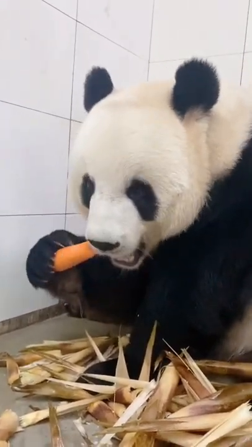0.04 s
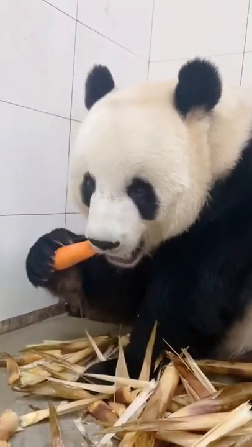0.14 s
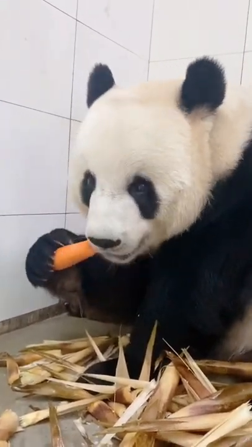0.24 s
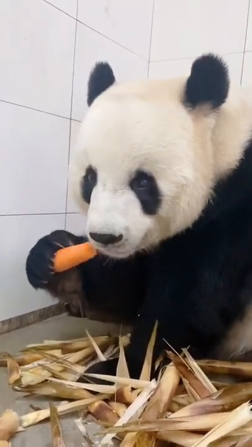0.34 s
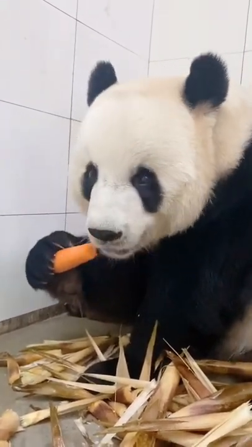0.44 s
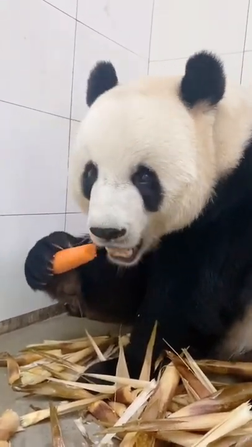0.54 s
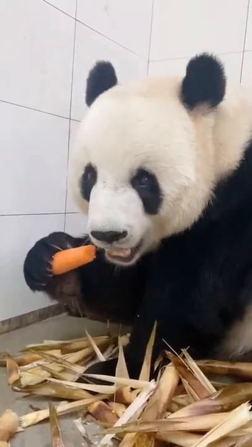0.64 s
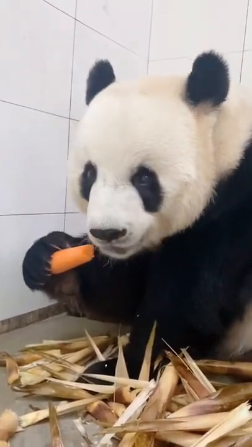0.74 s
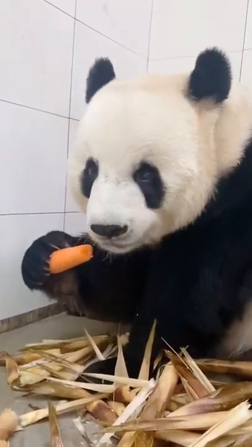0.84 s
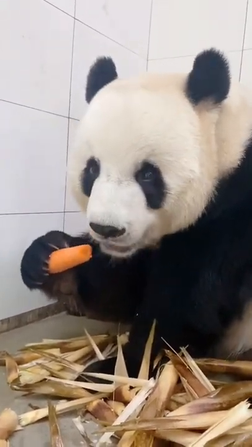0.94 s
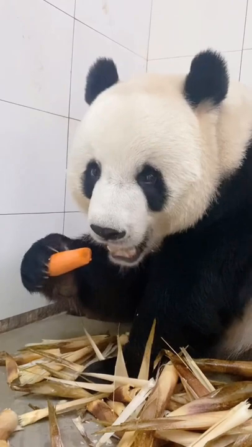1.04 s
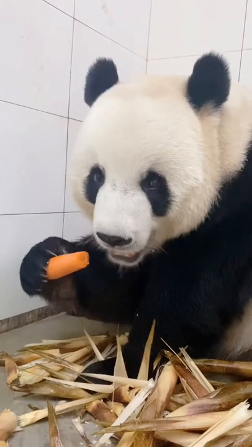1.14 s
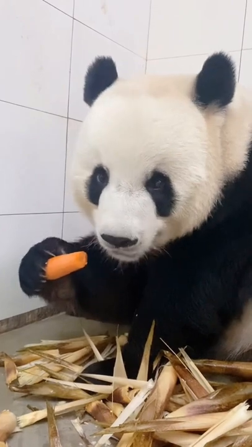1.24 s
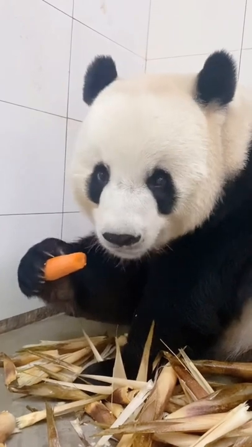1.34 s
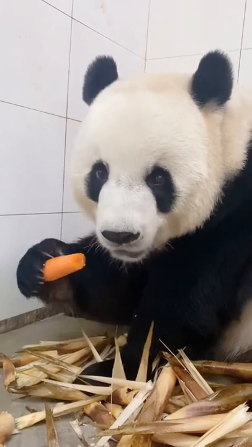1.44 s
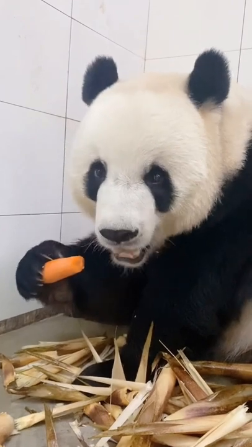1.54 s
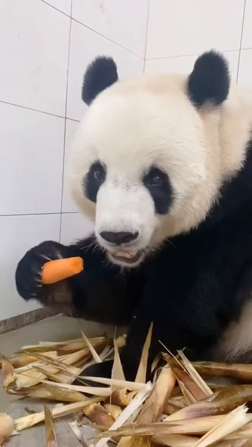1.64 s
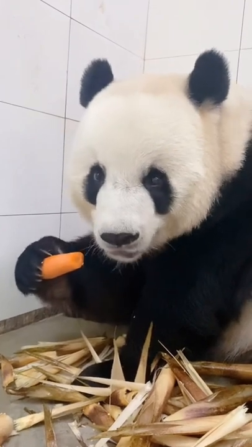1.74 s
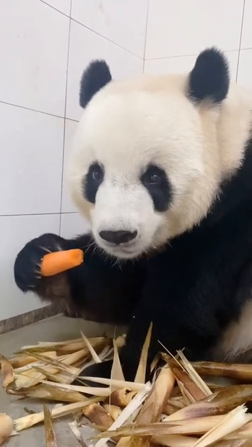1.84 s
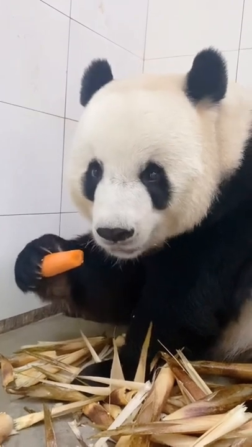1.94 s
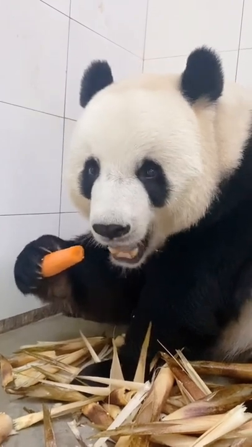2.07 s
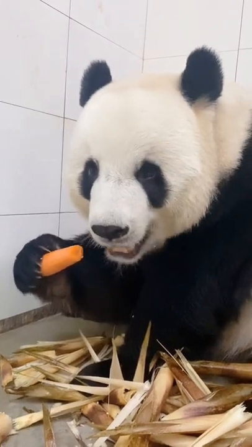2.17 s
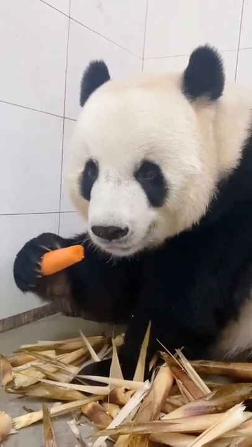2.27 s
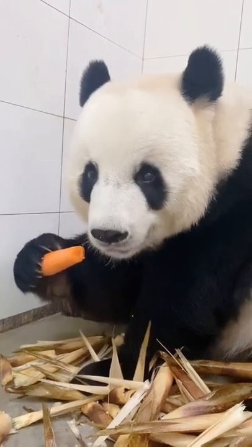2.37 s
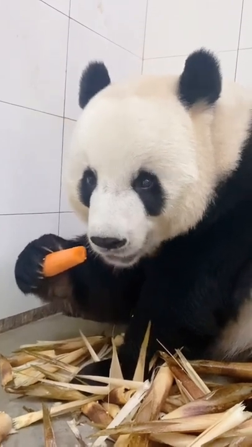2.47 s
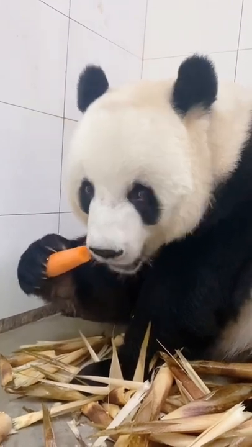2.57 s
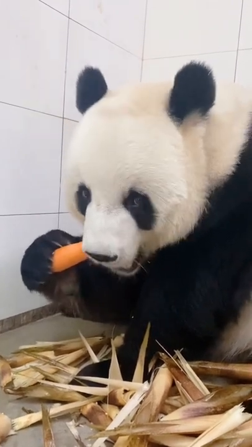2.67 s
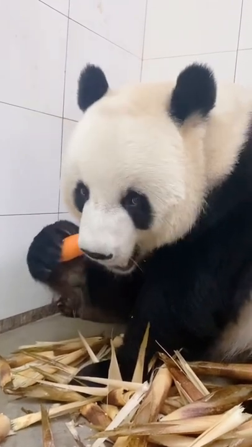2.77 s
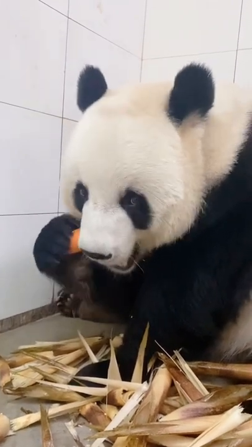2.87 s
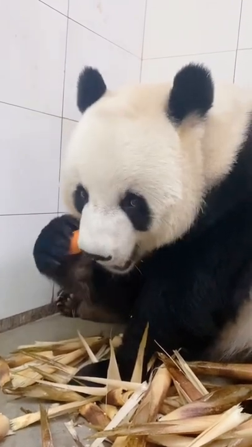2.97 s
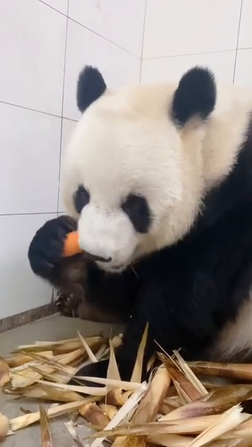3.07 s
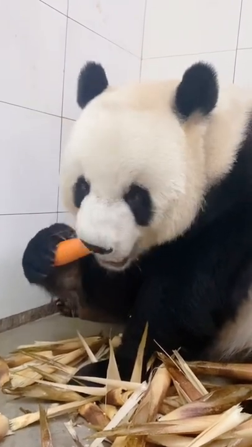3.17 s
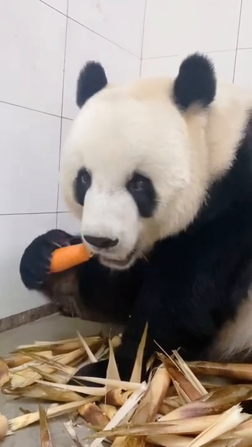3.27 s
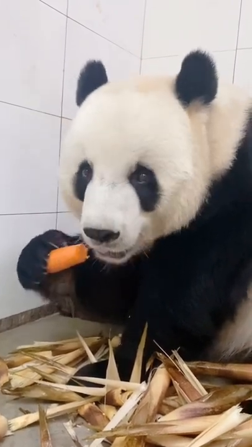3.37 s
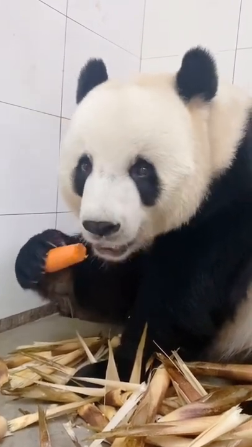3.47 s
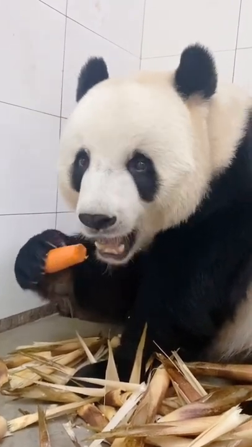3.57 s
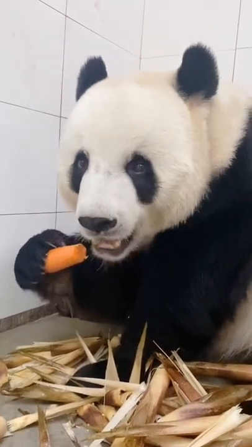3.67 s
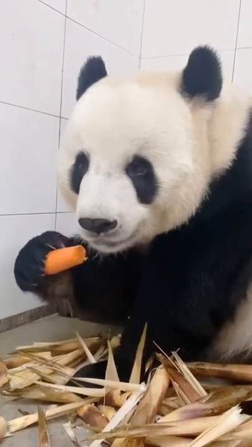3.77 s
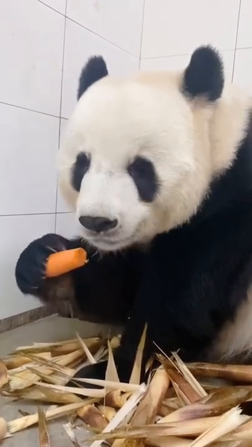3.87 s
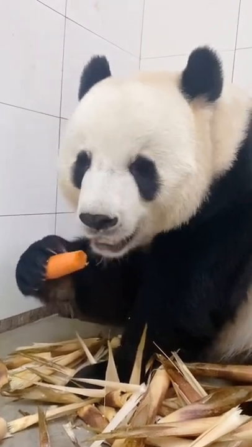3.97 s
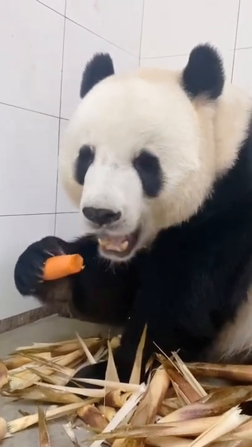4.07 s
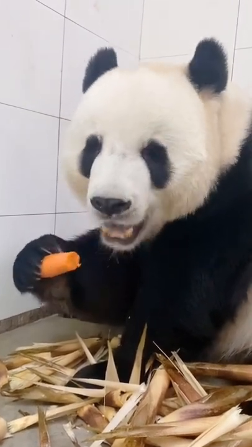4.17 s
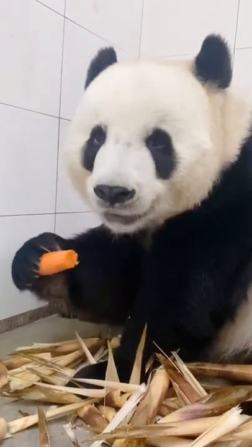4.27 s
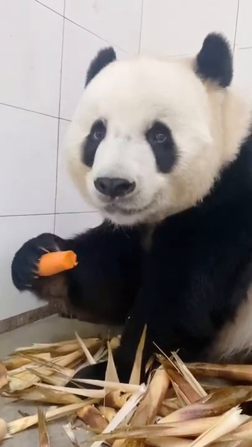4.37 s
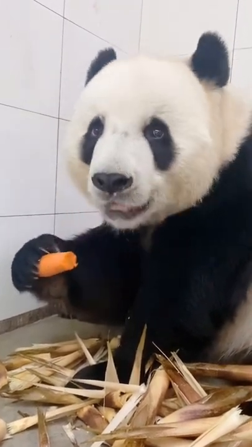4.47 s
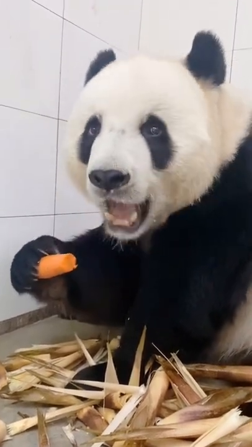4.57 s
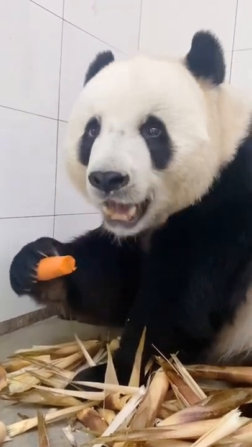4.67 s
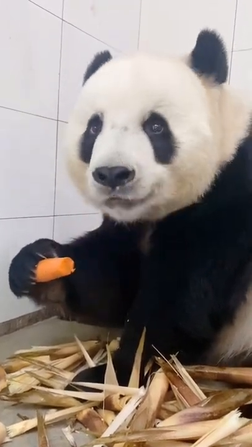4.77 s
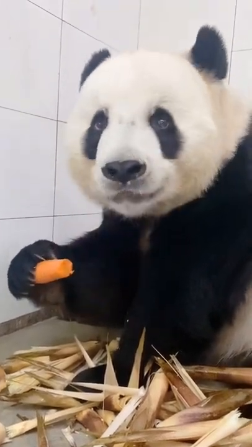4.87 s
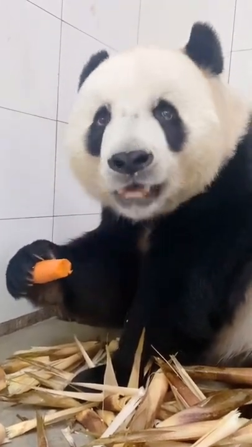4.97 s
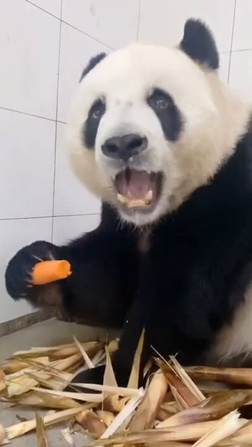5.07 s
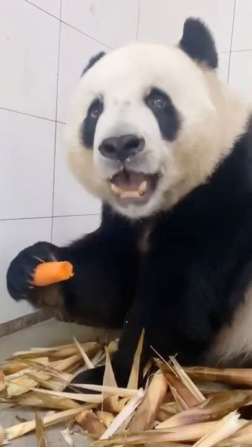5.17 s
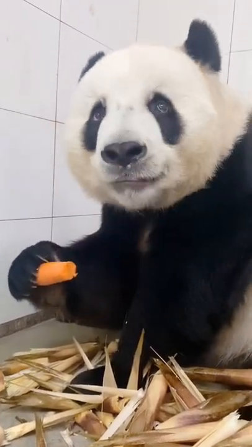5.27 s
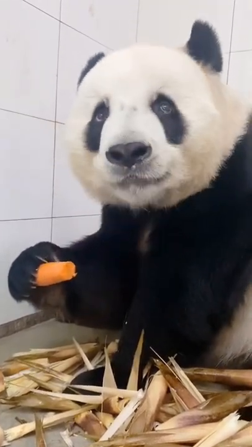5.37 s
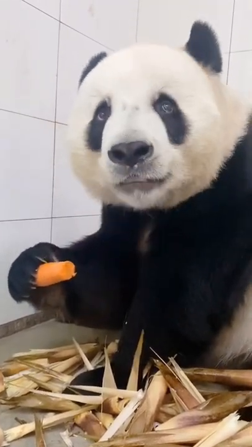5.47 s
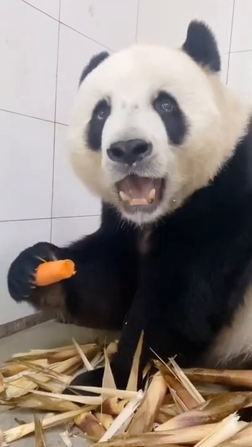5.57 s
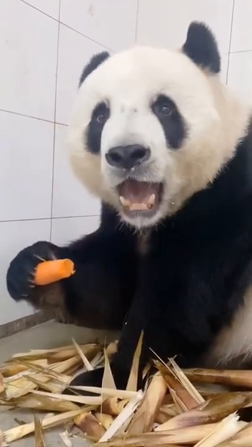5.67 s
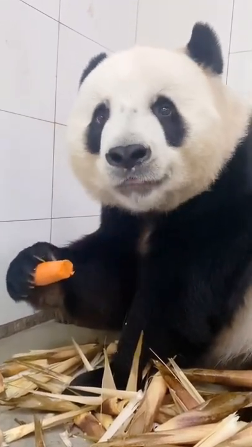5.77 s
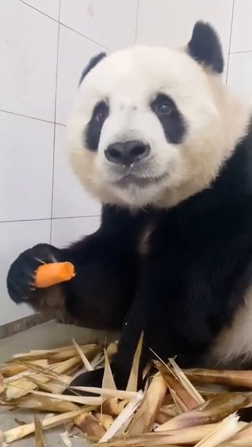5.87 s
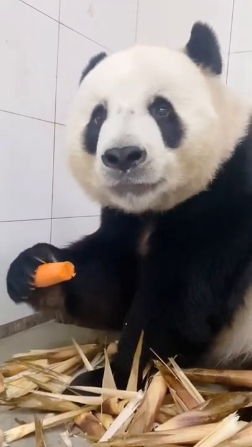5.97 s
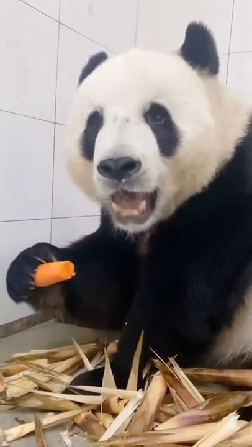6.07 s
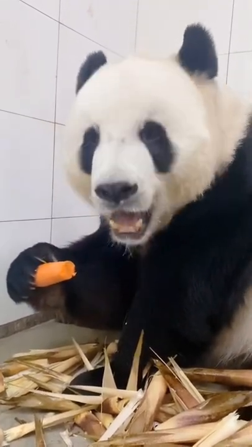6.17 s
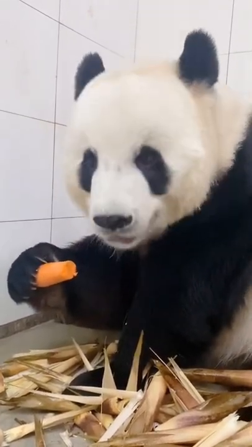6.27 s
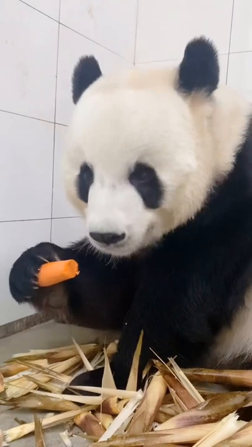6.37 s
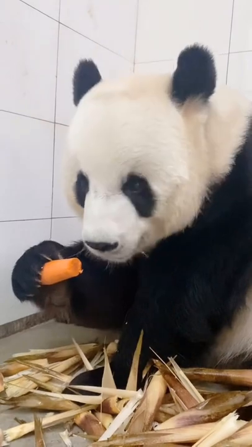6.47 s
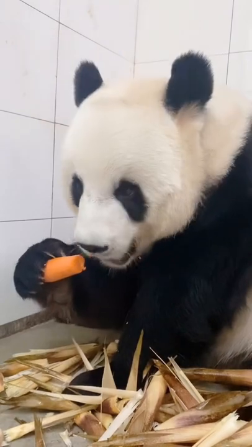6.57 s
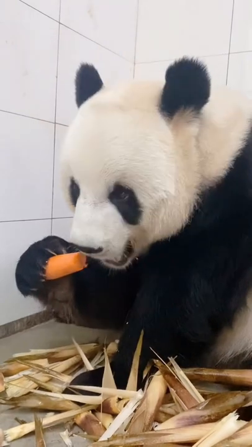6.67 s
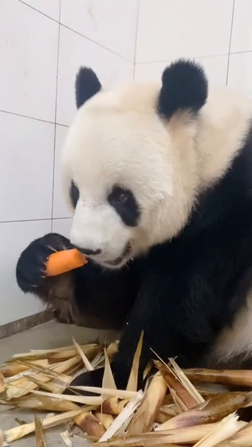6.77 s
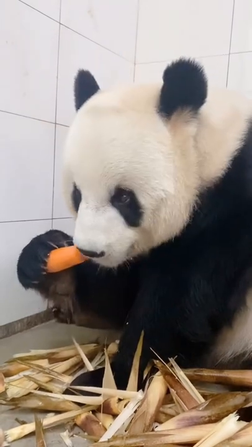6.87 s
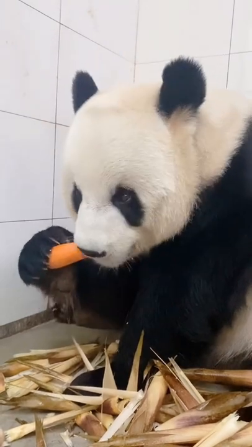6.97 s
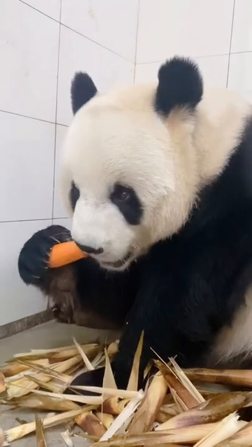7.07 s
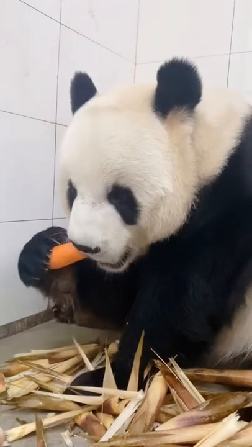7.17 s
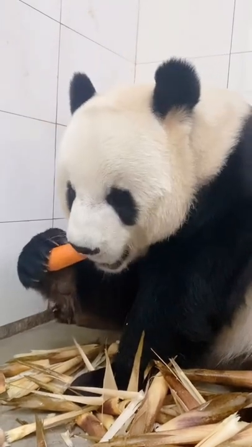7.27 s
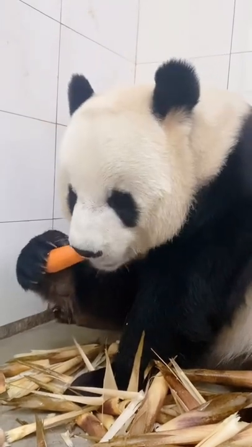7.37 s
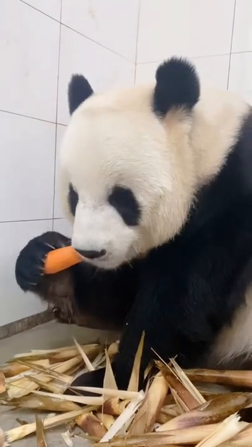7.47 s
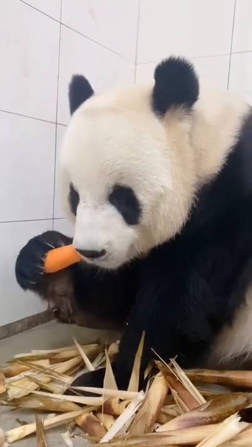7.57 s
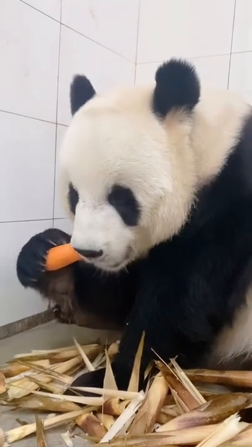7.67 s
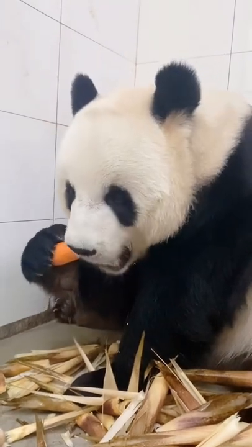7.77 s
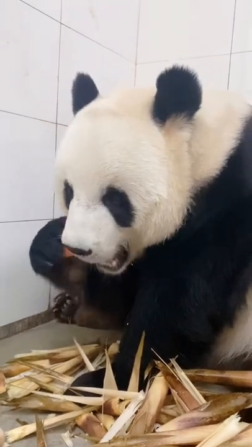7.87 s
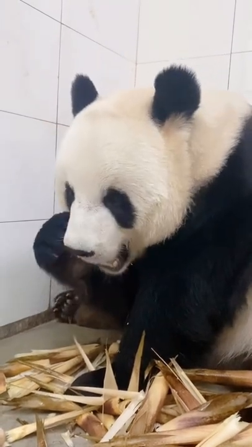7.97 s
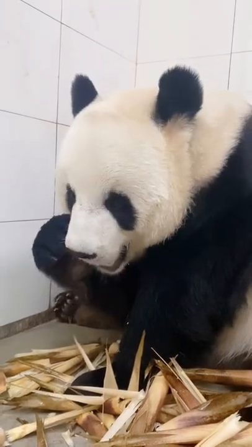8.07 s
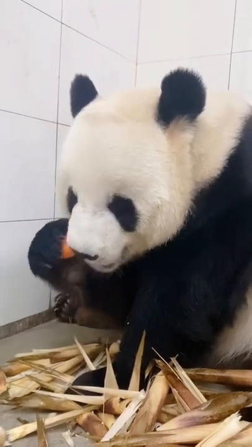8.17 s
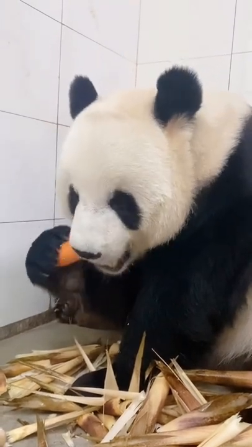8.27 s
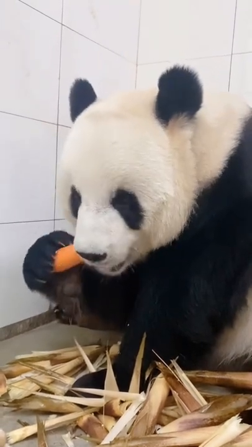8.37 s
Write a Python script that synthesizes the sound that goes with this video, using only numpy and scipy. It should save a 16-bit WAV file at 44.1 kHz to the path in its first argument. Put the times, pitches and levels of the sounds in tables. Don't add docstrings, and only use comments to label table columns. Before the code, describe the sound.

Raw carrot breaks and grinds between heavy molars, recorded close in stereo in a bright, reverberant room. Brittle snaps come in irregular groups, the loudest near three and eight seconds, hitting hard enough to distort slightly. Between them are moist crunches, small clicks and lip smacks, thinning out later. Low fan rumble, soft air hiss and muffled far thuds continue underneath.

```python
import sys
import numpy as np
from scipy import signal
from scipy.fft import rfft, irfft, next_fast_len
from scipy.io import wavfile
from scipy.ndimage import uniform_filter1d

SR = 44100
rng = np.random.default_rng(int(sys.argv[2]) if len(sys.argv) > 2 else 0)


def convert_level_to_amplitude(level_db):
    exponent = np.asarray(level_db, float) / 20
    return 10 ** exponent


def bounce(signal):
    frames = np.transpose(np.atleast_2d(signal))
    limited = np.clip(frames, -1, 1)
    pcm = np.round(limited * 32767).astype(np.int16)
    wavfile.write(sys.argv[1], SR, pcm)


N = 370881
SIZE = next_fast_len(N + SR)
HZ = np.arange(SIZE // 2 + 1) * SR / SIZE
T = np.arange(N) / SR


def read(table, hz=HZ):
    f, v = np.transpose(table)
    return np.interp(np.log(hz + 1), np.log(f + 1), v)


def unit(x):
    return x / np.sqrt(np.mean(x ** 2) + 1e-18)


def head_level(x, db):
    return convert_level_to_amplitude(db) * x / np.sqrt(np.mean(x[:310] ** 2))


def peak_level(x, db):
    return convert_level_to_amplitude(db) * x / np.abs(x).max()


def ring(x, hz, width_hz):
    return signal.lfilter(*signal.iirpeak(hz, hz / width_hz, fs=SR), x)


def ring_twice(x, hz, width_hz):
    return ring(ring(x, hz, width_hz), hz, width_hz)


def body(x, modes):
    return sum((-1) ** k * convert_level_to_amplitude(db) * ring(x, hz, width_hz) for k, (hz, width_hz, db) in enumerate(modes))


def band(x, lo_hz, hi_hz):
    return signal.sosfilt(signal.butter(3, [lo_hz, hi_hz], "band", fs=SR, output="sos"), x)


def walk(rate_hz):
    k = int(SR / rate_hz)
    steps = np.repeat(rng.standard_normal(N // k + 1), k)
    return unit(uniform_filter1d(uniform_filter1d(steps, k), k)[:N])


def add(out, x, at_s):
    i = int(at_s * SR)
    out[i:i + len(x)] += x[:N - i]


def grains(per_s, spread_db):
    hits = rng.random(N) < per_s / SR
    height = np.clip(rng.standard_normal(N), -2, 2)
    return unit(hits * height * convert_level_to_amplitude(spread_db * np.minimum(rng.exponential(size=N), 3)))


def burst(noise, rise_s, fall_s, spike_db):
    t = np.arange(noise.shape[-1]) / SR
    clicks = noise * convert_level_to_amplitude(spike_db * np.minimum(np.abs(noise[::-1]), 2))
    return clicks * (1 - np.exp(-t / rise_s)) * np.exp(-t / fall_s)


def tear(noise, hz, lock, rise_s, fall_s, spike_db):
    beat = np.sin(2 * np.pi * hz * np.arange(len(noise)) / SR)
    return burst(noise, rise_s, fall_s, spike_db) + lock * burst(beat, rise_s, fall_s, 0)


def cavity(x, hz, narrow_hz, wide_hz):
    return ring(ring(x, hz, narrow_hz), hz, wide_hz) + 0.07 * ring(x, hz, hz)


def thuds():
    # centre in seconds, length in seconds, pitch in Hz, level in dB.
    events = [(.6, 0.3, 116, -33.5), (0.749, 0.1, 55, -36), (1.261, 0.53, 200, -30.5),
              (1.4, 0.68, 127, -30.5), (2.696, 0.56, 186, -33), (2.8, 0.9, 115.6, -36.5),
              (3.276, 0.18, 202, -29.5), (3.303, 0.22, 59.6, -32.5), (4.05, 0.53, 162, -30.5),
              (4.639, .35, 83, -30), (5.102, 0.33, 105.7, -25), (5.348, 0.55, 111, -27.5),
              (5.471, 0.29, 208, -31.5), (5.951, .4, 60.6, -39.5), (5.849, 0.47, 110, -35.5),
              (6.499, 0.55, 189, -34.5), (6.5, 0.51, 111, -33.5), (7.2, 1, 60, -36.5),
              (8.331, 0.21, 69.6, -33), (8.33, 0.11, 211, -32.5)]
    spread, overtone_db = 1.393, -8
    out = np.zeros(N)
    for s, length_s, hz, db in events:
        noise = rng.standard_normal(2 * SR)
        n = min(int(1.6 * length_s * SR), 2 * SR)
        thud = unit(band(noise, hz / spread, hz * spread))[-n:]
        thud = thud + convert_level_to_amplitude(overtone_db) * unit(band(noise, hz * spread, 2 * hz * spread))[-n:]
        add(out, convert_level_to_amplitude(db - 6.5) * thud * np.hanning(n), s - n / SR / 2)
    return out


def background():
    # frequency in Hz, density in dB per Hz.
    air_spectrum = [(25, -65), (45, -6), (70, -1.5), (120, 1.5), (200, -0.5), (320, -10), (550, -12.5),
                    (1000, -14.5), (2200, -19.5), (3500, -34), (5500, -30), (8000, -32), (12000, -40),
                    (15000, -31.5)]
    air_db, fan_hz, fan_db = -39.5, 70.6, -43.5
    rumble_db, sway_db, sways_per_s = -45, 2.5, 2.76
    air = irfft(rfft(rng.standard_normal(N), SIZE) * convert_level_to_amplitude(read(air_spectrum)), SIZE)[:N]
    air = unit(air) * convert_level_to_amplitude(air_db + 1.5 * walk(7.3))
    fan = unit(ring(rng.standard_normal(N), fan_hz, 15)) * convert_level_to_amplitude(fan_db)
    rumble = unit(band(rng.standard_normal(N), 44.3, 83.0)) * convert_level_to_amplitude(rumble_db + sway_db * walk(sways_per_s))
    return rfft(air + fan + rumble + thuds(), SIZE)


def walls():
    # frequency in Hz, time to fall 60 dB in seconds.
    t60 = [(300, 1.8), (900, 0.77), (2300, 0.86), (5000, 0.74), (12000, 0.56)]
    # frequency in Hz, gain in dB.
    colour = [(400, -1), (860, 1), (1200, -3.5), (1900, -3), (2420, 2.5), (3100, 1), (4400, 0.5),
              (5200, -0.5), (6500, 0.5)]
    level_db, start_s = -6.5, 0.00092
    build_s, near_share, near_fall_s = 0.016, 1.2, 0.0062
    t, out = np.arange(SR) / SR, 0
    near = near_share * np.exp(-t / near_fall_s)
    build = 1 - 0.49 * np.exp(-t / build_s)
    for hz in 250 * 2. ** np.arange(0, 6.1, .5):
        decay = np.exp(-np.log(1000) * t / read(t60, hz)) * build + near
        out = out + band(rng.standard_normal(SR), hz / 2 ** .25, hz * 2 ** .25) * decay
    out = out * np.clip(t / start_s - 1, 0, 1)
    return rfft(out * convert_level_to_amplitude(level_db) / np.sqrt(np.sum(out ** 2)), SIZE) * convert_level_to_amplitude(read(colour))


def grind():
    # time in seconds, level in dB.
    effort_curve = [(0, -35), (.82, -36), (1.24, -38.5), (2.27, -43), (2.69, -38.5), (2.93, -43),
                    (3.19, -49), (3.3, -31), (3.58, -42), (4.03, -35.5), (4.45, -43), (5.15, -44),
                    (5.7, -43), (6.72, -43.5), (7.17, -53), (7.4, -42.5), (8.2, -47.5), (8.3, -28)]
    # resonance in Hz, width in Hz, level in dB.
    pulp_modes = [(900, 1360, -1.5), (2100, 1760, 3), (3360, 3200, 1), (5220, 3700, -7.5)]
    fizz_db = -11
    effort = convert_level_to_amplitude(np.interp(T, *np.transpose(effort_curve)) - 4)
    pulp = unit(body(grains(5000, 3.3), pulp_modes))
    fizz = unit(band(grains(9000, 2.8), 3900, 14600)) * convert_level_to_amplitude(fizz_db)
    return effort * (pulp * convert_level_to_amplitude(2 * walk(30)) + fizz * convert_level_to_amplitude(2 * walk(30)))


def squeak():
    # start in seconds, length in seconds, pitch in Hz, width in Hz, level in dB.
    slides = [
        (0, 0.15, 790, 150, -42.5),
        (2.33, 0.15, 3950, 900, -42),
        (7.15, .14, 1804, 65, -48),
        (5.0, .22, 108, 14, -31),
        (5.135, .065, 108, 25, -24),
        (6.795, .04, 750, 60, -36),
        (5.65, .1, 1300, 200, -43),
    ]
    out = np.zeros(N)
    for s, length_s, hz, width_hz, db in slides:
        n = int(length_s * SR)
        rub = unit(ring_twice(rng.standard_normal(SR), hz, width_hz)[-n:])
        add(out, convert_level_to_amplitude(db) * rub * np.sqrt(np.hanning(n)), max(s, 0))
    return rfft(out, SIZE)


def crunches():
    # centre in seconds, length in seconds, mouth resonance in Hz, crackle in dB, wet fizz in dB.
    clear = [(0.411, 0.063, 2020, -30, -33.5), (0.659, 0.026, 1850, -26, -48),
             (0.943, 0.054, 1880, -35, -47.5), (1.201, 0.031, 1850, -33, -42),
             (1.412, 0.092, 1900, -39, -43.5), (1.587, 0.034, 2400, -40, -39),
             (1.673, 0.028, 2620, -32, -51), (1.913, 0.054, 2410, -37.5, -67),
             (2.115, 0.04, 1700, -42, -38), (2.212, 0.032, 2270, -36, -42.5),
             (3.92, 0.097, 1150, -31, -31.5), (4.169, 0.026, 1680, -32, -45), (4.437, 0.14, 2270, -32, -34),
             (4.698, 0.041, 3100, -34, -35), (4.927, 0.088, 1510, -39.5, -49),
             (5.185, 0.095, 1280, -35.5, -40.5), (5.446, 0.12, 2400, -36, -39),
             (5.744, 0.057, 2270, -38, -46), (5.957, 0.11, 3240, -40, -42.5),
             (6.153, 0.08, 2410, -43.5, -40.5), (6.266, 0.056, 2170, -38, -44),
             (6.793, 0.044, 1160, -41.5, -47.5), (7.643, 0.045, 1210, -41.5, -42),
             (8.238, 0.094, 2110, -52.5, -37)]
    soft = [(0.25, 0.17, 2300, -47.5, -42), (1.104, 0.029, 2900, -49, -45), (2.69, 0.3, 2210, -59, -50),
            (3.18, 0.1, 2210, -44, -39), (4.03, 0.13, 2010, -49, -51), (4.754, 0.028, 1830, -39.5, -64),
            (5.108, 0.014, 2440, -38.5, -42), (5.655, 0.057, 1390, -46, -46),
            (6.071, 0.033, 2960, -43, -42), (6.675, 0.023, 1180, -46, -53), (7.54, 0.16, 1500, -53, -55),
            (6.49, 0.12, 3200, -44.5, -50.5), (7.21, 0.31, 1750, -53, -80), (8.225, 0.082, 5230, -49, -58)]
    # cell resonance in Hz, width in Hz, level in dB.
    cell_modes = [(760, 360, 0), (1150, 520, -2), (1625, 940, 2), (2170, 870, -1), (3100, 1000, -1.5),
                  (3970, 240, -10.5), (4720, 2300, -3)]
    cells = sum(convert_level_to_amplitude(db) * unit(ring_twice(grains(420, 2.6), hz, width_hz)) for hz, width_hz, db in cell_modes)
    clicks = grains(500, 3.3)
    fizz = sum(unit(band(grains(1500, 2.9), lo_hz, 1.4 * lo_hz)) for lo_hz in (5500, 7700, 10800)) / np.sqrt(3)
    out = np.zeros(N)
    for s, length_s, hz, crackle_db, fizz_db in list(clear) + list(soft):
        i, n = int((s - 0.75 * length_s) * SR), int(1.486 * length_s * SR)
        rung = unit(ring(ring(clicks[i:i + n], hz, 230), hz, 600))
        crackle = unit(0.4 * rung + unit(cells[i:i + n]))
        both = convert_level_to_amplitude(crackle_db + 4.0) * crackle + convert_level_to_amplitude(fizz_db - 1.5) * fizz[i:i + n]
        add(out, both * np.hanning(n) ** 0.89, i / SR)
    return out


def ticks(table):
    out = np.zeros(N)
    for s, hz, db in table:
        slip = tear(rng.standard_normal(1024), hz, 0.31, 0.00049, 0.0022, 4.2)
        add(out, head_level(cavity(slip, hz, 310, 900), db), s - .001)
    return out


def pricks():
    # time in seconds, peak in dB.
    events = [(1.1538, -21), (1.4155, -23), (3.911, -15), (4.3855, -21), (4.474, -26), (5.1515, -22.5),
              (5.398, -30), (5.4085, -29), (5.4205, -24), (5.706, -25), (5.715, -31), (5.7275, -26),
              (5.747, -20), (1.186, -28), (4.426, -24)]
    out = np.zeros(N)
    for s, db in events:
        click = band(burst(rng.standard_normal(256), .0001, .0005, 2.5), 750, 5500)
        add(out, peak_level(click, db), s - .0005)
    return out


def smacks():
    # time in seconds, peak in dB.
    events = [(0.388, -21.5), (0.6564, -16.5), (1.0903, -26.5), (1.183, -28.5), (1.351, -24.5),
              (1.581, -26.5), (2.015, -29), (2.1101, -34), (2.331, -32), (3.22, -20), (3.239, -11.5),
              (3.5205, -31.5), (3.847, -34), (3.864, -21.5), (4.387, -26), (4.452, -29), (4.5436, -33),
              (4.9456, -30.5), (5.1008, -33.5), (5.419, -28), (5.445, -28), (5.6644, -30), (5.705, -30.5),
              (6.2622, -34), (6.6644, -31), (7.24, -33.5), (7.661, -29), (8.1983, -34), (8.2521, -28),
              (8.294, -10)]
    out = np.zeros(N)
    for s, db in events:
        tick = burst(rng.standard_normal(1024), 0.00097, 0.0033, 3.2)
        tick = ring(tick, 5800, 3000) + ring(tick, 7800, 5000) + 0.34 * ring(tick, 10200, 3000)
        add(out, peak_level(tick, db + 5.5), s - .001)
    return out


def snaps():
    # time in seconds, resonance in Hz, level in dB.
    pops = [(.3883, 860, -14), (.402, 950, -20.5), (.6304, 900, -32.5), (0.657, 1150, -29),
            (0.8474, 970, -32), (0.89, 1340, -26), (0.9415, 1060, -23), (1.1516, 1067, -18.5),
            (1.2073, 710, -31), (1.3511, 880, -30.5), (1.414, 774, -29), (2.7985, 1150, -27.5),
            (3.2403, 882, -10), (3.8617, 1000, -13.5), (3.8743, 1150, -13), (3.8811, 1020, -9.5),
            (3.9096, 1080, -17.5), (4.3854, 1090, -26), (4.4196, 983, -18), (4.677, 996, -28.5),
            (4.9447, 960, -29.5), (5.1525, 1340, -24), (5.4637, 860, -28.5), (5.9259, 880, -29.5),
            (6.239, 665, -30.5), (6.771, 736, -34.5), (7.1216, 1010, -32.5), (7.3782, 1140, -35),
            (8.14, 930, -31.5), (8.2935, 883, -12)]
    splits = [(0.3884, 2070, -14.5), (.402, 2100, -27), (0.648, 1900, -23), (0.6573, 1960, -14.5),
              (0.89, 1940, -20), (.9407, 2010, -31), (1.2066, 1890, -24), (1.351, 1980, -20.5),
              (1.415, 1850, -29), (1.675, 2350, -28), (2.339, 2680, -34), (2.798, 2060, -27),
              (3.2168, 1530, -32), (3.2403, 2215, -8), (3.8612, 1830, -16.5), (3.8741, 2090, -17),
              (3.8817, 1850, -20), (3.92, 3000, -24.5), (4.1491, 1800, -20.5), (4.1703, 1850, -27),
              (4.3863, 1680, -30.5), (4.421, 2520, -30), (4.4593, 1730, -24.5), (4.9444, 1540, -29),
              (5.1512, 1506, -27), (5.747, 2700, -36), (6.264, 2360, -31), (6.793, 2000, -33),
              (8.14, 1730, -33.5), (8.2926, 2275, -9.5)]
    shreds = [(8.293, 1600, -19), (2.202, 2710, -36), (2.2, 1060, -35), (3.241, 1636, -19),
              (3.863, 756, -18.5), (3.9318, 1720, -40), (4.6771, 2300, -33), (5.212, 990, -27.5),
              (5.4202, 2300, -38), (5.7276, 2430, -33), (5.925, 1900, -36), (6.239, 2120, -33.5),
              (6.795, 1140, -34), (6.8, 720, -36), (6.784, 3980, -36.5), (7.3795, 1840, -39.5),
              (8.2936, 5000, -21.5), (4.15, 5000, -31), (7.3795, 790, -35.5), (8.2033, 890, -34),
              (4.6776, 3770, -25), (5.762, 930, -31), (5.7465, 4300, -35), (5.7276, 3600, -41),
              (5.6, 1500, -33), (5.436, 1550, -33), (5.156, 2900, -34), (.89, 3200, -30.5),
              (1.199, 1330, -31), (4.407, 5200, -33)]
    # time in seconds, level in dB.
    cracks = [(0.3886, -21.5), (.402, -40), (0.6578, -16), (0.888, -35), (1.3514, -28), (1.414, -39),
              (1.583, -33), (1.6754, -45), (2.0145, -34), (2.1144, -32.5), (2.338, -28), (3.2172, -27.5),
              (3.2395, -11), (3.8603, -23.5), (3.874, -23.5), (3.8804, -30), (3.9104, -31), (4.1497, -22.5),
              (4.3856, -34), (4.422, -25.5), (4.4587, -35), (4.6771, -26.5), (4.9465, -33.5), (5.42, -37),
              (5.707, -38), (5.9522, -31), (6.1473, -34), (6.264, -43), (8.231, -38), (8.292, -25)]
    # crack resonance in Hz, width in Hz, level in dB.
    crack_modes = [(3400, 1250, -2.5), (4240, 2830, -2.5), (5000, 780, 3), (5850, 8400, -8),
                   (8620, 4700, -7.5)]
    out = np.zeros(N)
    for s, hz, db in pops:
        slip = tear(rng.standard_normal(2048), hz, 0.34, 0.00068, 0.0016, 4.7)
        add(out, head_level(cavity(slip, hz, 187, 420), db), s - .001)
    for s, hz, db in list(splits) + list(shreds):
        slip = tear(rng.standard_normal(2048), hz, 0.23, 0.0004, 0.0023, 2.9)
        add(out, head_level(cavity(slip, hz, 265, 1160), db), s - .001)
    for s, db in cracks:
        crack = body(burst(rng.standard_normal(2048), 0.0042, 0.0021, 4.0), crack_modes)
        add(out, head_level(crack, db), s - .001)
    return out


def ports(common, apart):
    # frequency in Hz, share common to both ports.
    likeness = [(60, 1), (300, 0.97), (700, 0.37), (3000, 0.37), (7000, 0.49), (15000, 0.24)]
    # frequency in Hz, left minus right in dB.
    balance = [(60, -1), (110, -1), (200, -2.5), (380, -4.5), (700, -3), (1290, -2.0), (2380, -1),
               (4400, -1), (8120, 0), (15000, -0.5)]
    # frequency in Hz, left lead in radians.
    phase = [(0, 0), (1200, -.2), (2800, .5), (5000, .5), (6000, 1.5), (7300, 3.1), (10200, 6.3),
             (13500, 9.4), (16000, 11)]
    like = np.clip(read(likeness), 0, 1)
    half = convert_level_to_amplitude(read(balance) / 2) * np.exp(.5j * np.interp(HZ, *np.transpose(phase)))
    mix = np.sqrt((1 + like) / 2) * common + np.sqrt((1 - like) / 2) * apart * np.array([[1], [-1]])
    return irfft(mix * np.array([half, 1 / half]), SIZE)[:, :N]


def scene():
    # time in seconds, resonance in Hz, level in dB.
    lone = [(.388, 1780, -25), (.648, 2450, -25), (0.657, 3400, -22), (.658, 5000, -28),
            (1.387, 755, -29.5), (1.582, 3980, -40), (1.666, 1060, -30), (1.673, 1820, -30),
            (1.673, 2810, -34), (1.896, 2900, -40), (1.91, 2300, -37), (1.951, 2050, -34.5),
            (2.111, 1700, -39), (2.174, 1230, -38), (2.213, 2310, -32.5), (2.314, 2210, -41),
            (3.2411, 2380, -17), (3.243, 5100, -18), (3.243, 3800, -24), (3.861, 3270, -20),
            (3.873, 5620, -30), (3.91, 4650, -35), (3.995, 4850, -37), (4.001, 990, -30),
            (4.094, 2600, -35), (4.158, 1815, -22.5), (4.385, 3860, -30.5), (4.419, 5700, -32),
            (4.425, 2360, -29), (4.437, 2300, -33), (4.456, 2500, -33), (4.907, 1620, -36),
            (4.944, 5470, -30), (5.106, 2130, -36), (5.19, 2200, -35), (5.205, 1810, -36),
            (5.407, 3360, -35), (5.45, 1917, -35), (5.705, 5290, -38), (5.747, 1870, -32.5),
            (5.952, 3230, -39), (6.771, 1190, -37), (6.787, 1200, -32), (6.794, 1600, -33),
            (6.805, 760, -34), (6.822, 760, -41), (7.146, 1120, -40), (7.242, 1159, -39.5),
            (7.509, 1290, -45), (7.627, 1330, -41), (7.656, 1950, -40), (8.293, 2550, -20),
            (8.293, 4080, -23), (8.293, 6300, -27), (3.2415, 540, -22.5), (3.862, 1490, -26),
            (0.89, 1560, -31), (2.798, 1560, -35), (1.154, 1470, -37), (8.14, 1350, -34.5)]
    fibres = [(.392, 5000, -28), (.405, 935, -22), (.412, 3300, -29), (.448, 900, -30), (.662, 3000, -21),
              (.661, 5000, -27), (.662, 2000, -23), (.935, 4000, -33.5), (.937, 750, -29.5),
              (.941, 1960, -27), (.948, 1100, -25.5), (.955, 1050, -30), (1.1, 2950, -37),
              (1.17, 1050, -32), (1.199, 2900, -35), (1.206, 5700, -38), (1.39, 2940, -33),
              (1.391, 2000, -34), (1.416, 2900, -34), (1.433, 800, -34), (3.2415, 1950, -17),
              (3.244, 3530, -19), (3.243, 4150, -21), (3.244, 4930, -19), (3.331, 900, -28),
              (4.149, 2950, -24.5), (4.152, 5450, -24.5), (4.153, 3400, -26), (4.159, 2900, -28),
              (4.171, 3500, -32), (4.364, 3880, -36), (4.386, 5670, -36), (4.41, 5700, -35),
              (4.426, 3700, -31), (4.44, 5900, -33), (4.458, 3200, -31), (4.458, 4800, -34),
              (4.483, 3700, -35), (4.485, 2300, -34), (5.148, 1450, -27), (5.151, 2700, -32),
              (5.18, 2600, -36), (5.419, 3370, -35), (5.517, 1560, -35), (5.639, 4800, -41),
              (5.661, 5700, -40), (5.762, 3600, -39), (3.911, 1900, -29)]
    far, far_apart = background(), background()
    room, room_apart = walls(), walls()
    slides = squeak()
    chewing = grind() + crunches() + ticks(lone) + ticks(fibres) + pricks() + smacks() + snaps()
    mouth = rfft(chewing, SIZE)
    return ports(mouth + slides, 0) + ports(mouth * room + far, mouth * room_apart + far_apart)


def top_cut(x):
    return signal.sosfilt(signal.butter(12, 16360, fs=SR, output="sos"), x)


def record(dry):
    mix = np.clip(dry, -1, 1)
    return top_cut(mix)


dry = scene()
out = record(dry)
bounce(out)
```